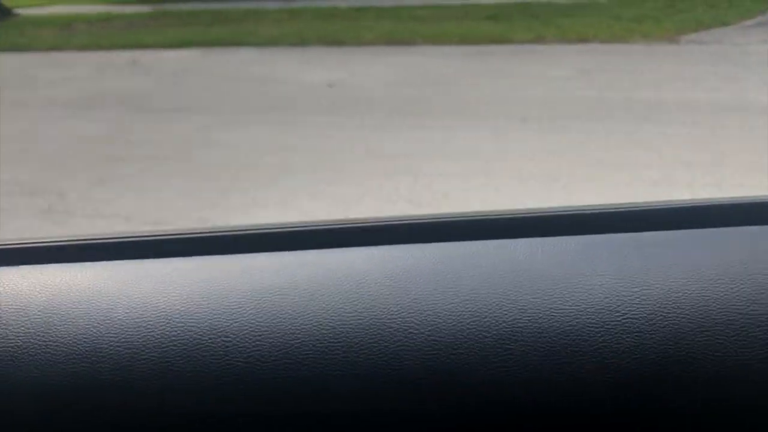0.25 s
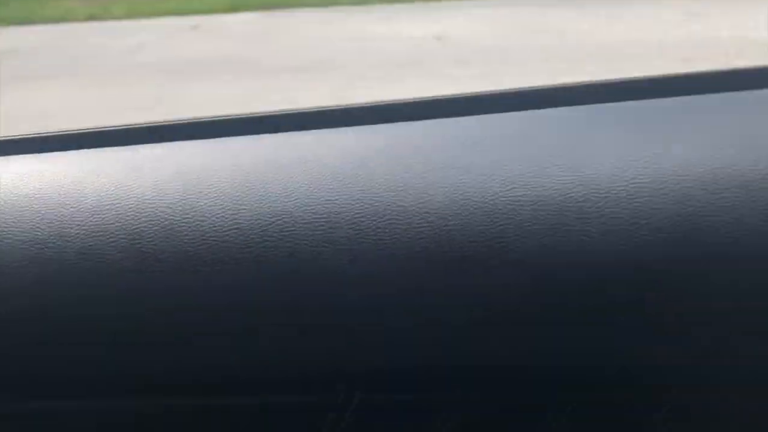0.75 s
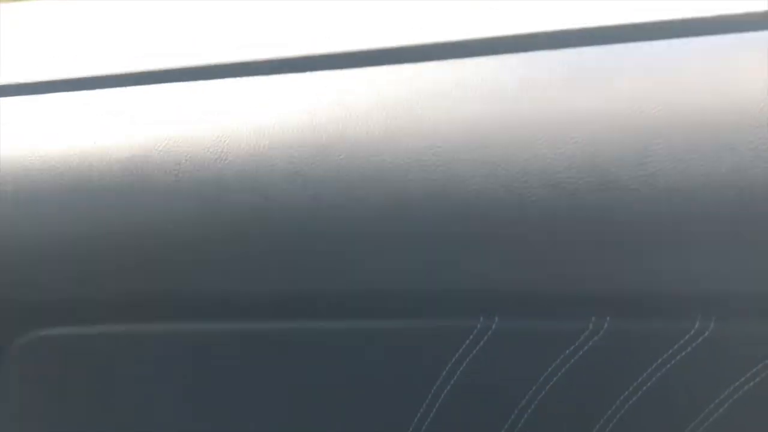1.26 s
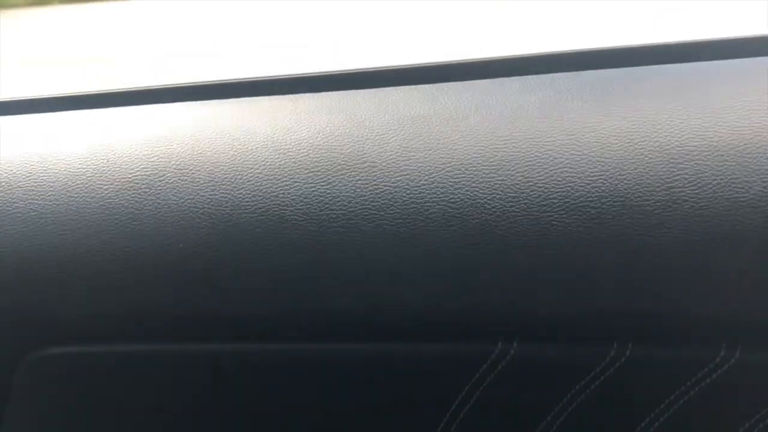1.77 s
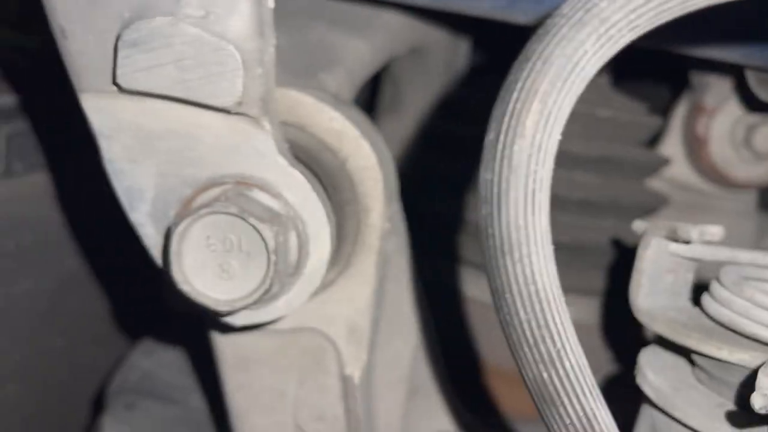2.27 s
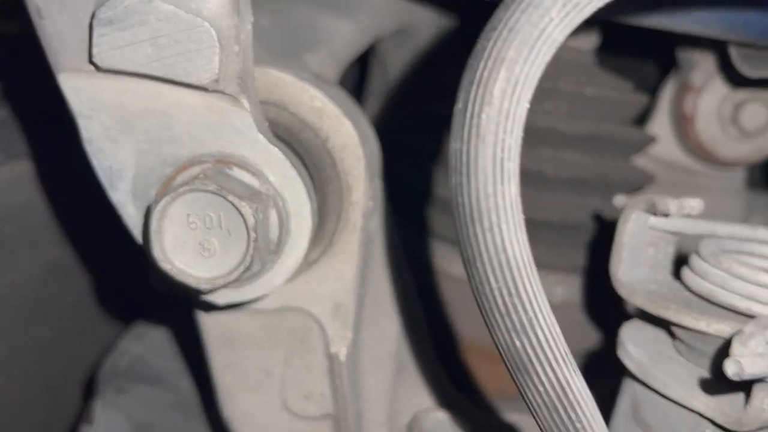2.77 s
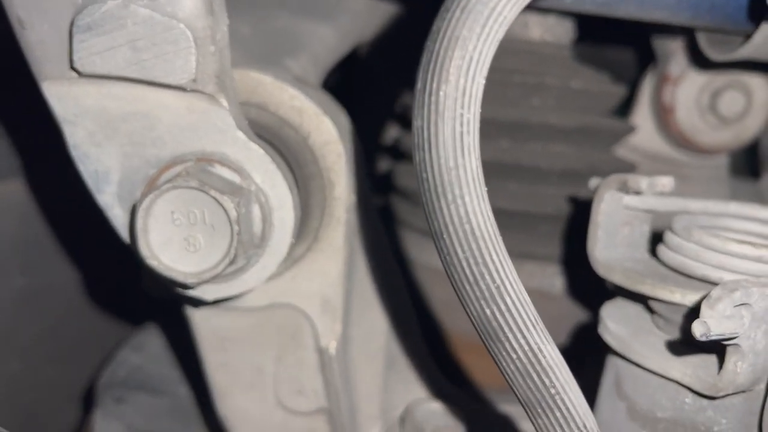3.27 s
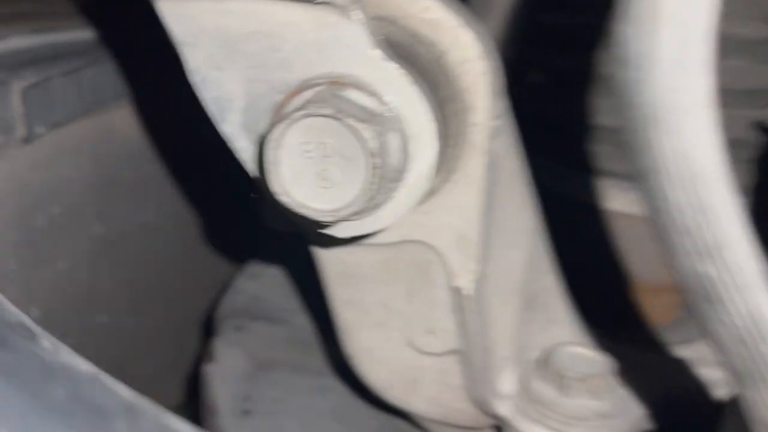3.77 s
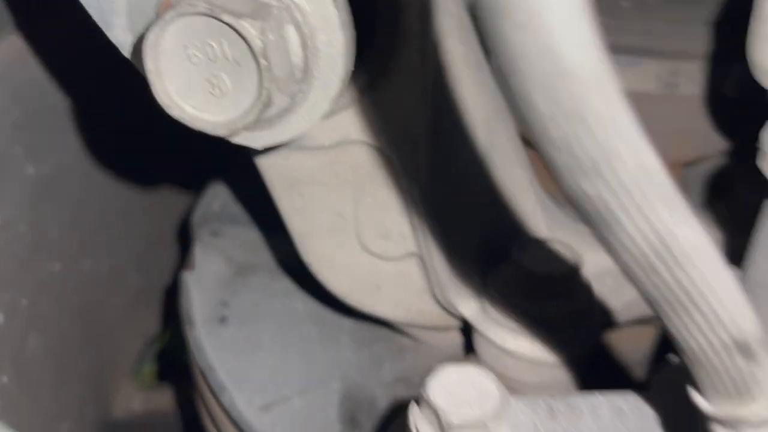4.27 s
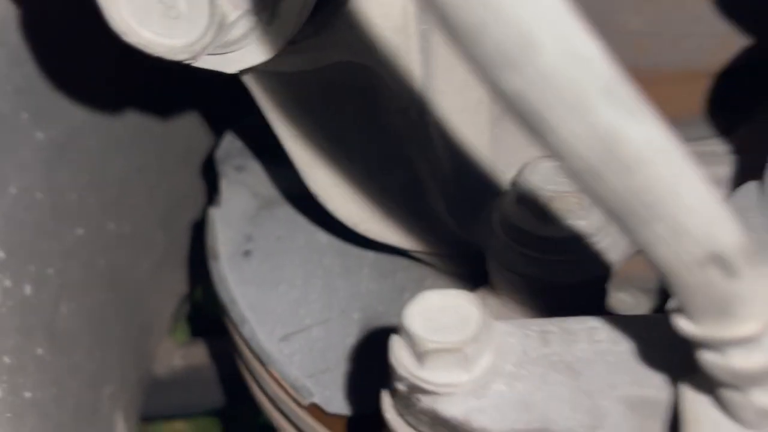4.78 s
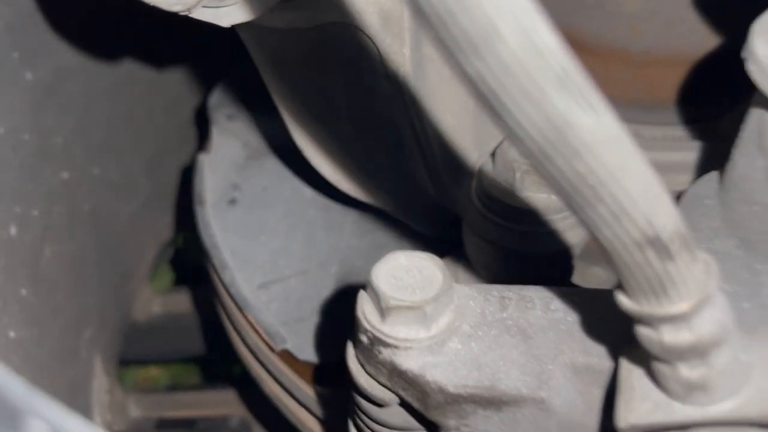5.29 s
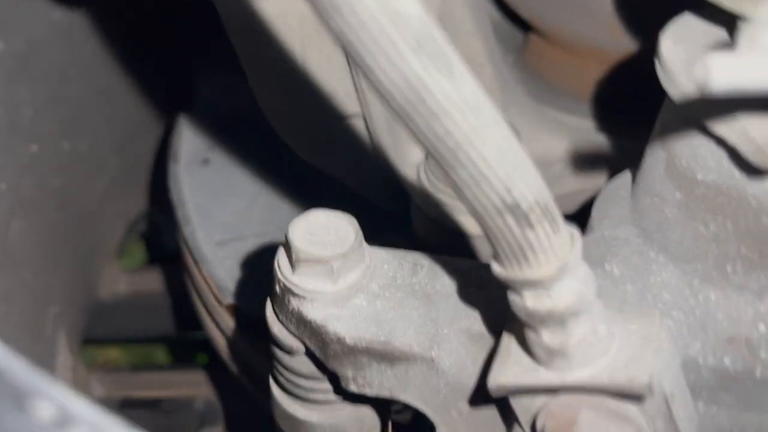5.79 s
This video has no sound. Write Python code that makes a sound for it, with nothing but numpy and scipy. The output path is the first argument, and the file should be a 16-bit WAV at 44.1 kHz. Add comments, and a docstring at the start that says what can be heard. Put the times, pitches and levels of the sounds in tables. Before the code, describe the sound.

A car's dry rear suspension is heard first from the cabin, as faint rasps under low road noise, with a very faint brake squeal. Then the microphone is suddenly close in the wheel well, with a deep engine idling steadily. Single ringing steel clicks tighten into a rapid, ratcheting creak that slows again. Three loud clicks follow, then a short gap and a string of further clicks.

```python
"""Inside a slowly rolling car, then close to its creaking rear suspension arm.
In the cabin a dry joint rasps over a low road hum, and a brake squeals faintly. Beside the wheel a V8
engine idles while the loaded joint sticks and slips. Each slip strikes the steel arm and makes it ring:
single clicks and a few tiny squeaks come first, then the slips speed up into a creak and slow again."""
import sys
import numpy as np
from scipy import signal
from scipy.fft import rfft, irfft, next_fast_len
from scipy.io import wavfile
from scipy.ndimage import map_coordinates

SR = 44100
rng = np.random.default_rng(int(sys.argv[2]) if len(sys.argv) > 2 else 0)


def to_wav(s):
    """Save 16-bit WAV."""
    ch = np.atleast_2d(s).T  # columns
    pcm = np.round(np.clip(ch, -1, 1) * 32767)  # PCM
    wavfile.write(sys.argv[1], SR, pcm.astype(np.int16))


N = 266143
TIME = np.arange(N) / SR
RING_TIME = np.arange(16384) / SR  # time axis for one dying ring
OUTSIDE_AT_S = 2.111

# road noise in the cabin: f/Hz, level/dB
ROAD_SPECTRUM = [(15, -29), (40, -16), (70, -12.5), (130, -8.5), (185, -3), (240, -11.5), (330, -16.5),
                 (480, -19.5), (700, -26.5), (1500, -35.5), (3000, -43), (6000, -44), (11000, -50.5),
                 (15000, -57)]
# how alike left and right are in the cabin: f/Hz, likeness (1 = the same)
CABIN_LIKENESS = [(100, 1), (400, 1), (1500, 1), (8000, 1)]
# bumps under the tyres: t/s, level/dB
BUMPS = [(.12, -44), (.222, -36.5), (.605, -41), (1.13, -45), (1.4, -49)]
# how often the engine fires: t/s, f/Hz
FIRING_RATE = [(0, 51.3), (1, 50.2), (2.4, 49.9), (3.3, 51.6), (3.9, 50), (4.5, 49.7), (5.1, 47.8),
               (6, 47.2)]
# engine drone in the cabin: multiple of the engine's cycle rate, level/dB
DRONE_TONES = [(8, -4), (13, -9.5), (16, -6), (19, -13), (20, -13.5), (21, -16), (22, 1.5), (23, -0.5),
               (25, -10.5), (30, -11.5), (42, -24)]
# rasps of the dry joint: t/s, length/s, level/dB, slips per second, singing f/Hz
RASPS = [(0.032, 0.046, -59, 790, 1840), (0.136, 0.035, -63, 810, 5370), (.883, 0.054, -50, 1030, 960),
         (0.914, 0.048, -52.5, 720, 1600), (1.079, 0.082, -48.5, 330, 1463),
         (1.283, 0.034, -48.5, 650, 2990), (1.31, 0.053, -49, 450, 1840), (1.376, 0.04, -51.5, 400, 966)]
# notes at which the car body rings: f/Hz, width/Hz, level/dB
BODY_RESONANCES = [(480, 93, 9), (630, 150, 3), (978, 59, 5.5), (1500, 22, -5), (1874, 47, 5.5),
                   (2100, 10, 9), (2270, 48, -3), (3120, 33, 1), (4210, 32, -8), (5460, 15, 2),
                   (5640, 14, -6), (7050, 220, -12), (9350, 3900, -27)]

# how hard the engine works, most during the creak: t/s, level/dB
ENGINE_EFFORT = [(2.11, -4.5), (2.7, -3.3), (3.3, -0.5), (3.9, -4.5), (4.3, -8.5), (5.1, -8), (6.03, -6.5)]
# low exhaust boom: multiple of the cycle rate, level/dB
BOOM_TONES = [(9, -18), (10, -14), (14, -13), (15, -53), (16, 1.5), (17, -2.5), (18, -12), (19, 4.5),
              (20, -27.5), (21, -5), (22, -10), (23, -15.5), (24, -10), (26, -25), (28, -15.5)]
# higher growl: multiple of the cycle rate, level/dB
GROWL_TONES = [(33, -7.5), (36, -7), (37, -0.5), (38, 0), (39, -2.5), (40, -3.5), (41, -5.5), (42, -28),
               (43, -1.5), (45, -11), (48, -8), (50, -32.5), (52, -9.5), (53, -9), (54, -6.5), (56, -10.5),
               (60, -11), (62, -10)]
# rush of fan, belts and exhaust: f/Hz, level/dB
RUSH_SPECTRUM = [(20, -29), (45, 3), (130, 0), (190, -5.5), (260, -13), (400, -10.5), (700, -18),
                 (1150, -23.5), (1800, -33.5), (3000, -38.5), (3700, -51.5), (4800, -44.5), (10800, -39.5),
                 (12500, -67), (15500, -105)]
# notes at which the air in the wheel well rings: f/Hz, width/Hz, level/dB
WELL_RESONANCES = [(235, 12, 7), (497.7, 19.4, 6), (696, 26, 4.5), (996, 11, 11.5), (1135, 4.7, 12),
                   (1257, 17, 8), (1512, 16, -3), (3780, 270, 16)]
# how alike left and right are beside the wheel: f/Hz, likeness
WELL_LIKENESS = [(100, .998), (250, .93), (500, .78), (1000, .94), (2000, .9), (4000, .88), (8000, .96),
                 (12000, .98)]
# how much louder the left is there: f/Hz, level/dB
LEFT_BALANCE = [(40, .1), (125, .7), (250, 1.6), (500, 3.7), (1000, 2.2), (2000, .6), (4000, -.5),
                (8000, 0)]
# how far the left wave runs ahead of the right: f/Hz, phase/rad
LEFT_LEAD = [(2000, 0), (2600, .7), (3400, .7), (4300, 1.4), (4900, 2.7), (5400, 5.7), (6300, 6.5),
             (7900, 8.3), (9200, 9.4), (10900, 10.9), (11800, 12.3), (14000, 12.6)]

# single loud slips: t/s, high snap level/dB, lower ring level/dB
CLICKS = [(2.112, -29, -31.5), (2.402, -16, -21), (2.574, -23, -26), (2.722, -15, -22), (2.834, -20, -24.5),
          (2.986, -19, -22.5), (4.274, -10, -20), (4.39, -10, -19.5), (4.551, -11, -18.5),
          (5.256, -9, -20.5), (5.367, -16, -25), (5.53, -8, -19), (5.623, -16.5, -22.5),
          (5.715, -15.5, -21.5), (5.798, -17.5, -23), (5.876, -13, -21), (5.939, -20, -26.5),
          (6.008, -14, -20.5)]
# speed of the joint during the creak: t/s, slips per second
CREAK_SPEED = [(2.722, 24.6), (3.297, 51.6), (3.699, 50.5), (3.979, 38.3), (4.2, 19.1)]
# notes of the steel arm: f/Hz, level/dB, t60/s (the time to fade by 60 dB)
ARM_NOTES = [(499, -14, 0.35), (666, -19, 0.35), (1028, -11, 0.23), (1103, -12.5, 0.35), (1290, -16, 0.3),
             (1421, -17, 0.27), (1528, -11, 0.14), (1750, -17, 0.16), (1954, -12, 0.17), (2056, -13, 0.19),
             (2120, -12, 0.14), (2541, -17, 0.2), (2900, -13, 0.15), (3488, -20, 0.19), (4161, -16, 0.14),
             (4258, -16, 0.13), (4380, -14.5, 0.13), (5315, -3.5, 0.08), (6322, -8, 0.15),
             (6626, -11, 0.17), (7343, -4.5, 0.16), (8077, -3, 0.15), (8484, -5, 0.18), (8830, -2, 0.15),
             (9442, -2, 0.15), (10277, -3, 0.1), (10454, 1, 0.1), (10654, -2, 0.09), (10831, -1, 0.12)]
# the arm's clatter in the wheel well: f/Hz, level/dB
CLATTER_SPECTRUM = [(150, -34), (500, -30), (800, 4), (1100, 7.5), (1280, 4), (1530, 17), (1720, -3.5),
                    (2100, 9), (2400, -3.5), (2900, -0.5), (3400, -5.5), (4300, -5.5), (4700, -8),
                    (5700, -9), (8000, -9), (9100, -5.5), (10800, -2.5), (12500, -13.5), (15500, -63)]
# extra shaping for the tail of that clatter: f/Hz, level/dB
TAIL_SPECTRUM = [(1000, -4.5), (7500, 10), (10800, 11), (12500, -15)]
# squeaks of the sliding joint: t/s, length/s, level/dB, f/Hz, added octave's relative level/dB
SQUEAKS = [(2.419, .016, -25, 950, 13), (2.450, .014, -31, 945, 3), (2.473, .014, -28.5, 950, 4)]


def amp(db):
    """Turns decibels into a number to multiply by."""
    return 10 ** (np.asarray(db) / 20)


def unit(x):
    """Scales a signal to an average strength (rms) of 1."""
    return x / np.sqrt(np.mean(x ** 2) + 1e-20)


def at_hz(table, hz):
    """Looks up a table along a logarithmic frequency axis."""
    f, value = np.transpose(table)
    return np.interp(np.log(hz + 1), np.log(f + 1), value)


def curve(table):
    """Joins the points of a time table with straight lines."""
    return np.interp(TIME, *np.transpose(table))


def add(mix, start_s, sound):
    """Mixes a sound in at the given time."""
    part = mix[..., max(round(start_s * SR), 0):][..., :sound.shape[-1]]
    part += sound[..., :part.shape[-1]]


def colour(x, spectrum):
    """Turns each frequency up or down as a table says."""
    n = x.shape[-1]
    return irfft(rfft(x) * amp(at_hz(spectrum, np.fft.rfftfreq(n, 1 / SR))), n)


def drift(rate_hz):
    """A smooth random wobble of strength 1."""
    points = rng.standard_normal(2048)
    return unit(map_coordinates(points, [TIME * rate_hz * 2], order=2, mode="wrap"))


def stereo_noise(n, likeness):
    """Left and right noise, as alike as a table says."""
    left, other = rfft(rng.standard_normal((2, n)))
    alike = np.clip(at_hz(likeness, np.fft.rfftfreq(n, 1 / SR)), -1, 1)
    right = alike * left + np.sqrt(1 - alike ** 2) * other
    return irfft(np.array([left, right]), n)


def road(rumble_db=-47, hiss_db=-44, split_hz=900, bump_s=0.02):
    """The tyres hiss steadily and rumble, louder for a moment at each bump."""
    noise = unit(colour(stereo_noise(N, CABIN_LIKENESS), ROAD_SPECTRUM))
    rumble = signal.sosfiltfilt(signal.butter(2, split_hz, fs=SR, output="sos"), noise)
    jolts = sum(amp(db) * np.exp(-abs(TIME - peak_s) / bump_s) for peak_s, db in BUMPS)
    return (amp(rumble_db) + jolts) * rumble + amp(hiss_db) * (noise - rumble)


def firings():
    """Counts how many times the cylinders have fired so far."""
    return np.cumsum(curve(FIRING_RATE)) / SR


def engine_tones(tones, waver):
    """Uneven cylinders make wavering tones at multiples of the cycle rate (one cycle is 8 firings)."""
    cycles, points_s = firings() / 8, TIME[::2048]
    out = np.zeros(N)
    for multiple, db in tones:
        strength = 1 + waver * np.interp(TIME, points_s, rng.standard_normal(len(points_s)))
        out += amp(db) * strength * np.sin(2 * np.pi * (multiple * cycles + rng.random()))
    return unit(out)


def cabin_drone(db=-36):
    """The engine's low hum, heard from inside."""
    return amp(db) * engine_tones(DRONE_TONES, waver=0.27)


def rasps(jitter=0.16, uneven_db=3, sing_db=-7, sing_width_hz=40, echo_db=-6, echo_t60=0.28):
    """Fast, uneven slips ring the joint and the car body, and the sound dies away in the cabin."""
    out, t = np.zeros((2, N)), RING_TIME
    body = sum(amp(db) * width * np.exp(-np.pi * width * t) * np.cos(2 * np.pi * hz * t)
               for hz, width, db in BODY_RESONANCES)
    for start_s, length_s, db, rate, sing_hz in RASPS:
        gaps, sizes = rng.standard_normal((2, 128))
        slip_s = np.cumsum(np.exp(jitter * gaps)) / rate
        inside = slip_s < length_s
        taps = np.zeros(round(length_s * SR) + 1)
        taps[(slip_s[inside] * SR).astype(int)] = amp(uneven_db * sizes[inside])
        taps *= signal.windows.tukey(len(taps), .3)  # fade in and out
        singing = np.exp(-np.pi * sing_width_hz * t) * np.sin(2 * np.pi * sing_hz * t)
        rasp = unit(signal.fftconvolve(taps, body))
        rasp += amp(sing_db) * unit(signal.fftconvolve(taps, singing))
        add(out, start_s, amp(db) * rasp * np.sqrt(len(taps) / np.sum(rasp ** 2)))
    tail = unit(rng.standard_normal((2, len(t))) * amp(-60 * t / echo_t60)) / np.sqrt(len(t))
    return out + amp(echo_db) * signal.fftconvolve(out, tail, axes=1)[:, :N]


def brake(hz=3700, db=-70, waver=0.53):
    """A faint, thin brake squeal that swells as the car slows."""
    swell = np.interp(TIME, [1.6, 1.74, 1.95, 2.1], [0.26, 1, 1, .2])
    flicker = 1 + waver * drift(23.2)
    pitch_hz = hz + 8 * drift(20)
    return amp(db) * swell * flicker * np.sin(2 * np.pi * np.cumsum(pitch_hz) / SR)


def well_ring(x):
    """The air in the hollow around the wheel rings along with a sound."""
    return sum(amp(db) * signal.lfilter(*signal.iirpeak(hz, hz / width, SR), x)
               for hz, width, db in WELL_RESONANCES)


def engine(pulse_db=-13, boom_db=-11.5, growl_db=-19.5, rush_db=-19, throb=0.075, well_db=-2):
    """An idling V8: firing pulse, exhaust boom, growl and rush, all swelling with its effort."""
    effort_db = curve(ENGINE_EFFORT)
    beat = np.sin(2 * np.pi * firings())
    pulse = amp(pulse_db + 0.7 * effort_db) * unit(beat * (1 + 0.13 * drift(6)))
    boom = amp(boom_db + 0.19 * effort_db) * engine_tones(BOOM_TONES, waver=0.093)
    growl = amp(growl_db + 1.264 * effort_db) * engine_tones(GROWL_TONES, waver=0.84)
    air = colour(stereo_noise(N, WELL_LIKENESS), RUSH_SPECTRUM)
    air = unit(air + amp(well_db) * well_ring(air))
    rush = amp(rush_db + 1.04 * effort_db) * air * (1 + throb * beat)
    return pulse + boom + growl + rush


def arm_ring(t):
    """The notes of the steel arm fade after one blow."""
    return sum(amp(db - 60 * t / t60) * np.sin(2 * np.pi * (hz * t + rng.random()))
               for hz, db, t60 in ARM_NOTES)


def arm_strike(crack_t60, tail_t60, tail_db, rise_s, notes_db, echo_s, echo_db, echo_spread_s=.0016):
    """One slip: a crack, its echo off the wheel well, a noisy tail and the ringing arm."""
    t = RING_TIME
    noise = stereo_noise(len(t), WELL_LIKENESS)
    crack = noise * amp(-60 * t / crack_t60)
    echo = noise * amp(echo_db) * np.exp(-((t - echo_s) / echo_spread_s) ** 2)
    tail = colour(noise, TAIL_SPECTRUM) * amp(tail_db - 60 * t / tail_t60)
    clatter = colour(crack + echo + tail, CLATTER_SPECTRUM)
    fade_in = 1 - np.exp(-t / rise_s)
    fade_out = np.minimum(4 * (1 - t / t[-1]), 1) ** 2
    strike = (unit(clatter) + amp(notes_db) * unit(arm_ring(t))) * fade_in * fade_out
    return strike / np.sqrt(np.sum(strike ** 2) / SR)


def knock(db, hz=620, t60=0.049, rise_s=0.0008):
    """The dull, short knock of the arm's mounting."""
    t = RING_TIME
    thud = np.sin(2 * np.pi * hz * t) * amp(-60 * t / t60) * (1 - np.exp(-t / rise_s))
    return amp(db) * thud / np.sqrt(np.sum(thud ** 2) / SR)


def creak_slips(alternate_above_hz=48.6, scatter_db=1.3, jitter_s=.0005):
    """The turning joint slips once per step of travel. Gives rows like those of CLICKS."""
    times, speeds = np.transpose(CREAK_SPEED)
    travel = np.cumsum(np.interp(TIME, times, speeds, left=0, right=0)) / SR
    slip_s = TIME[1:][np.diff(np.floor(travel)) > 0]
    shift, uneven = rng.standard_normal((len(slip_s), 2)).T
    # near top speed, strong and weak slips take turns
    fast = np.interp(np.interp(slip_s, times, speeds), [alternate_above_hz, speeds.max()], [0, 1])
    swing = -fast * (-1) ** np.arange(len(slip_s))
    # the slips grow louder as the joint winds up
    wound_s = slip_s - times[0]
    snap_db = -24.5 + 6.5 * wound_s + 2.1 * swing + scatter_db * uneven
    ring_db = -26.5 + 3.5 * wound_s + 3.5 * swing + scatter_db * uneven
    return np.transpose([slip_s + jitter_s * shift, snap_db, ring_db])


def all_slips(same_slip_s=.012):
    """The loud clicks and the creak; a loud click takes the place of a creak slip very close to it."""
    click_s = np.transpose(CLICKS)[0]
    return list(CLICKS) + [row for row in creak_slips() if abs(row[0] - click_s).min() > same_slip_s]


def joint(snap_gain_db=-14, ring_gain_db=-11, split_hz=4700, ring_lag_s=0.001011, scatter=0.084):
    """Every slip strikes the same arm; a spray of tiny slips makes each one a little different."""
    # the high snap comes at once; the lower ring swells with the echo and lasts longer
    snap = arm_strike(crack_t60=0.068, tail_t60=0.18, tail_db=-9, rise_s=0.0013,
                      notes_db=-5.5, echo_s=0.0038, echo_db=-24)
    ring = arm_strike(crack_t60=0.021, tail_t60=0.24, tail_db=-9.5, rise_s=0.003,
                      notes_db=3.5, echo_s=0.00686, echo_db=2.5)
    snap = signal.sosfilt(signal.butter(6, split_hz, "high", fs=SR, output="sos"), snap)
    ring = signal.sosfilt(signal.butter(6, split_hz, fs=SR, output="sos"), ring + knock(db=-23))
    snap_blows, ring_blows = np.zeros((2, 1, N))
    for start_s, snap_db, ring_db in all_slips():
        tiny_slips = rng.standard_normal(48) * np.exp(-np.arange(48) / 12)
        force = np.r_[1, scatter * tiny_slips]
        force /= np.linalg.norm(force)
        add(snap_blows, start_s, amp(snap_db + snap_gain_db) * force)
        add(ring_blows, start_s + ring_lag_s, amp(ring_db + ring_gain_db) * force)
    snaps = signal.fftconvolve(snap_blows, snap, axes=1)
    rings = signal.fftconvolve(ring_blows, ring, axes=1)
    return (snaps + rings)[:, :N]


def squeaks(glide=0.013, rough=0.088, echo_db=-4, echo_t60=0.18, well_db=1, arm_db=-31, scrape_hz=1700):
    """Short slides of the joint squeak, scrape the arm into ringing and echo in the wheel well."""
    out, scrape = np.zeros((2, N))
    wobble = rough * drift(300)
    for start_s, length_s, db, hz, octave_db in SQUEAKS:
        progress = np.linspace(0, 1, round(length_s * SR))
        swell = np.sin(np.pi * progress)
        pitch_hz = hz * (1 + glide * (.5 - progress) + wobble[round(start_s * SR):][:len(progress)])
        phase = 2 * np.pi * np.cumsum(pitch_hz) / SR
        tone = np.sin(phase) + amp(octave_db) * np.sin(2 * phase)
        add(out, start_s, amp(db) * unit(tone * swell))
        add(scrape, start_s, swell)
    t = RING_TIME[:8192]
    tail = rng.standard_normal(len(t)) * amp(-60 * t / echo_t60)
    arm = signal.sosfilt(signal.butter(2, scrape_hz, fs=SR, output="sos"), arm_ring(t))
    ringing = signal.fftconvolve(scrape * rng.standard_normal(N), arm / np.linalg.norm(arm))[:N]
    echo = signal.fftconvolve(out, tail / np.linalg.norm(tail))[:N]
    return out + amp(well_db) * well_ring(out) + amp(echo_db) * echo + amp(arm_db) * ringing


def left_and_right(x):
    """Sound from the wheel well reaches the two sides with different timing and level."""
    size = next_fast_len(N + 4096)
    hz = np.fft.rfftfreq(size, 1 / SR)
    left = amp(at_hz(LEFT_BALANCE, hz) / 2) * np.exp(.5j * at_hz(LEFT_LEAD, hz))
    return irfft(rfft(x, size) * np.array([left, 1 / left]), size)[:, :N]


def scene():
    """The cabin first, then suddenly the wheel well."""
    cabin = road() + cabin_drone() + rasps() + brake()
    wheel_well = left_and_right(engine() + joint() + squeaks())
    outside = np.clip((TIME - OUTSIDE_AT_S) / .003, 0, 1)
    return (1 - outside) * cabin + outside * wheel_well


def record(dry):
    """Rounds off the loudest peaks and removes the very highest treble."""
    knee, ceiling, top_hz = .7, .95, 15000
    room = ceiling - knee
    over = np.maximum(abs(dry) - knee, 0)
    rounded = np.clip(dry, -knee, knee) + np.sign(dry) * room * np.tanh(over / room)
    lowpass = signal.firwin(255, top_hz, window=("kaiser", 8), fs=SR)
    return signal.oaconvolve(rounded, lowpass[None], "same")


dry = scene()
out = record(dry)
to_wav(out)
```